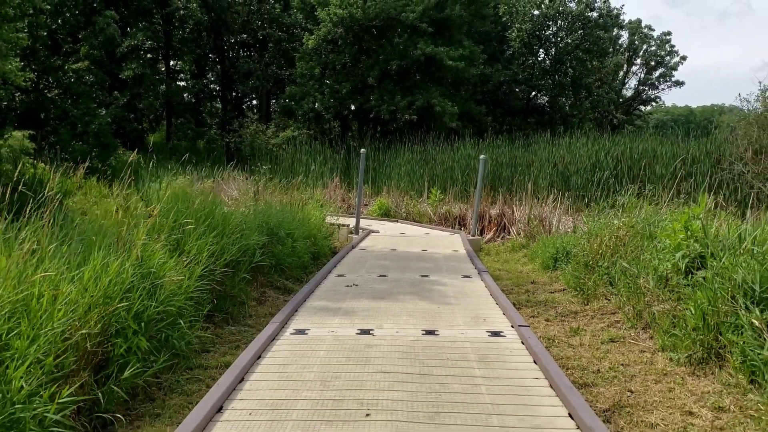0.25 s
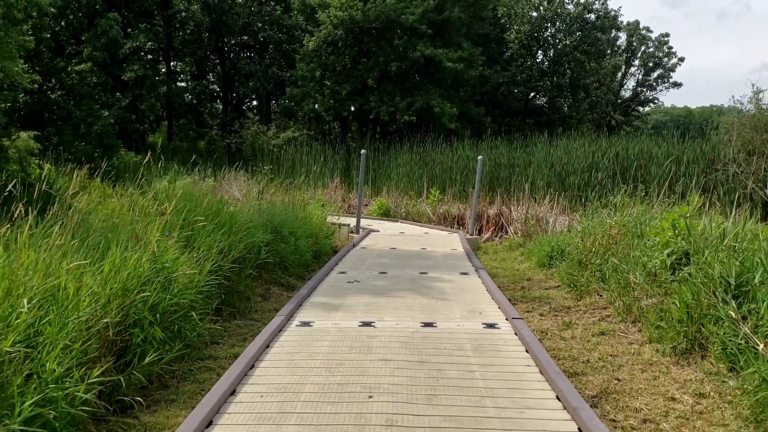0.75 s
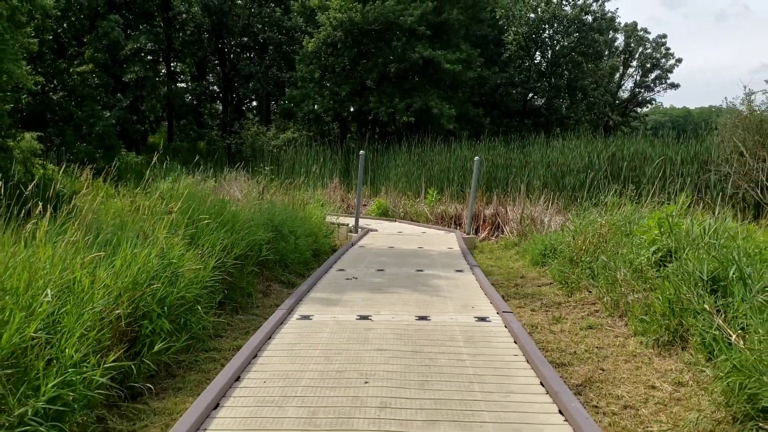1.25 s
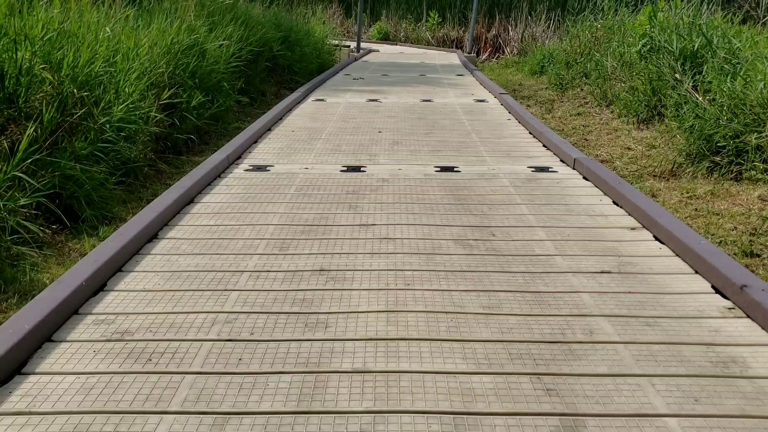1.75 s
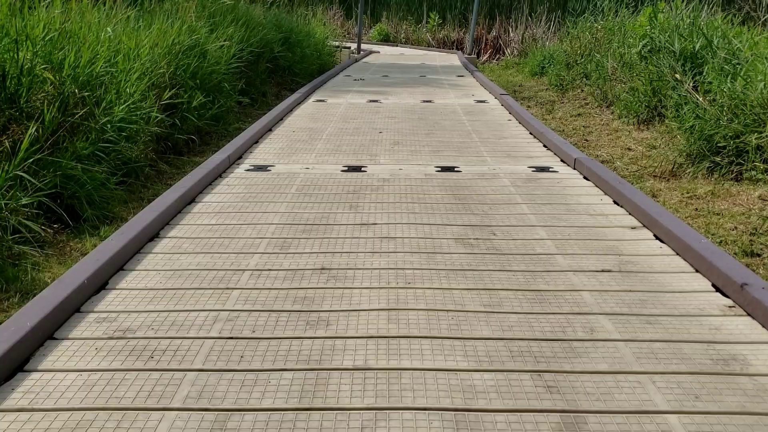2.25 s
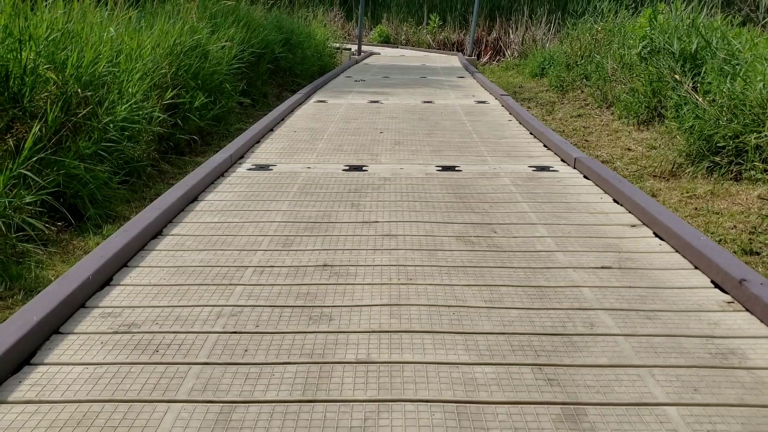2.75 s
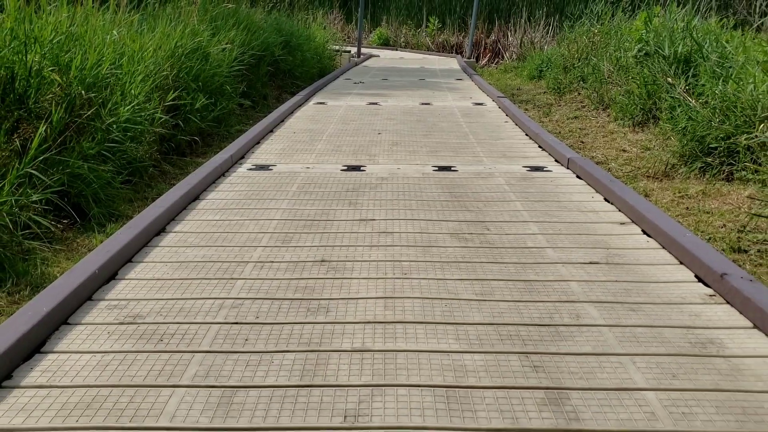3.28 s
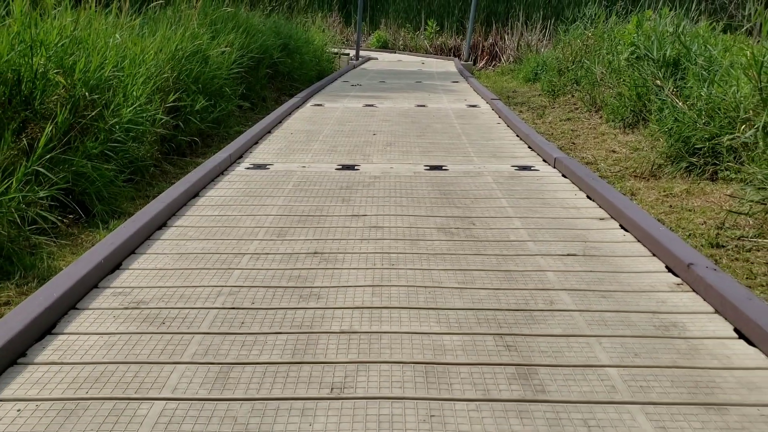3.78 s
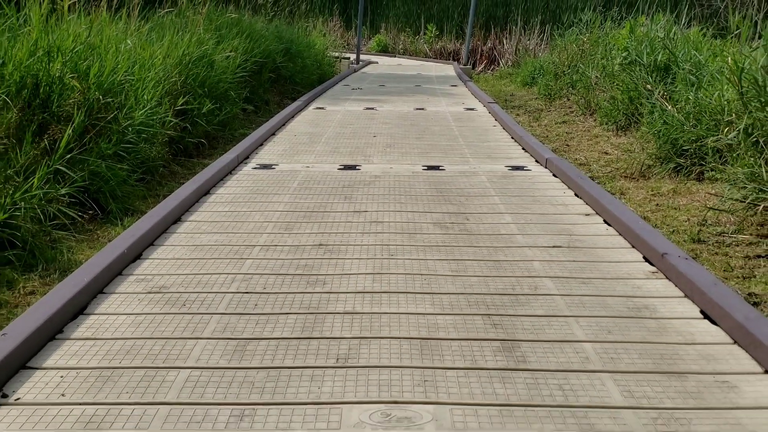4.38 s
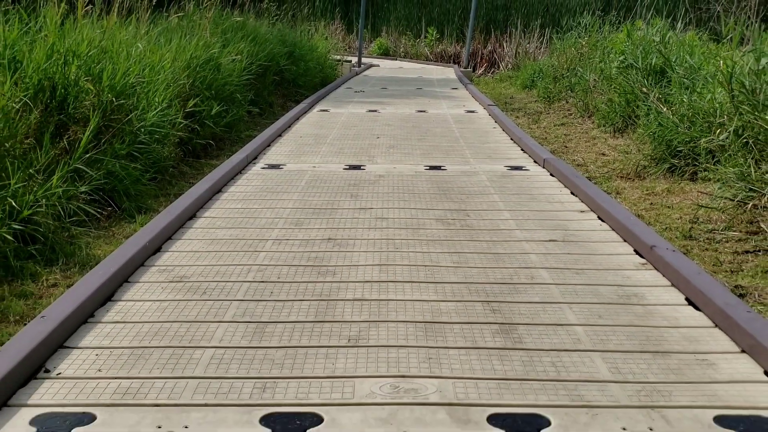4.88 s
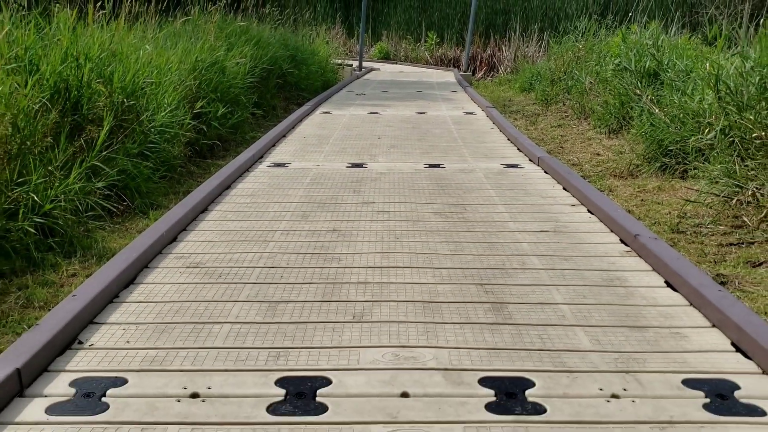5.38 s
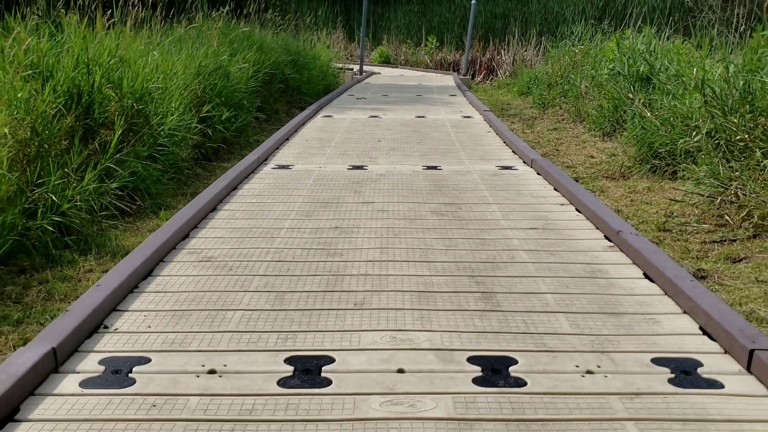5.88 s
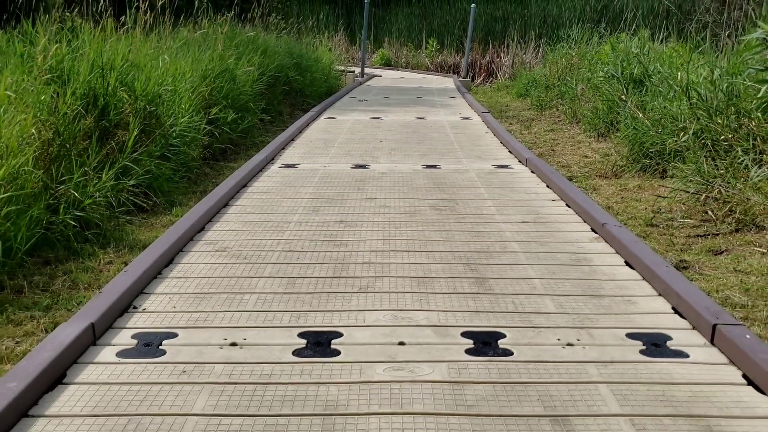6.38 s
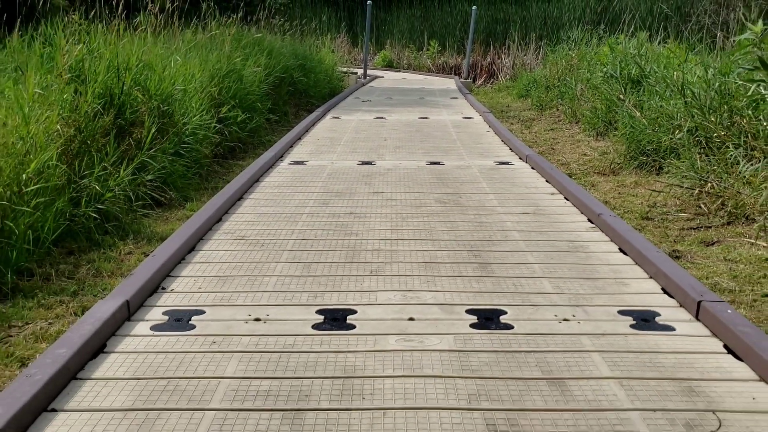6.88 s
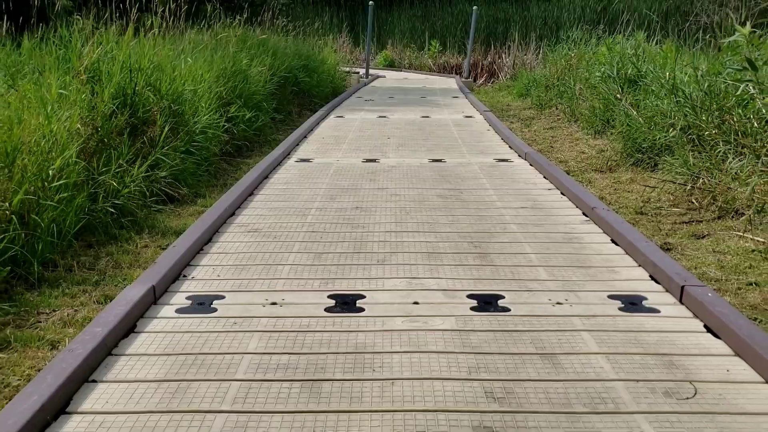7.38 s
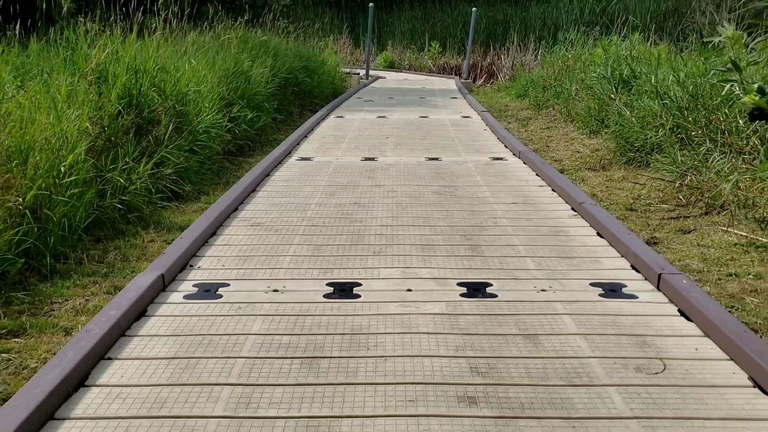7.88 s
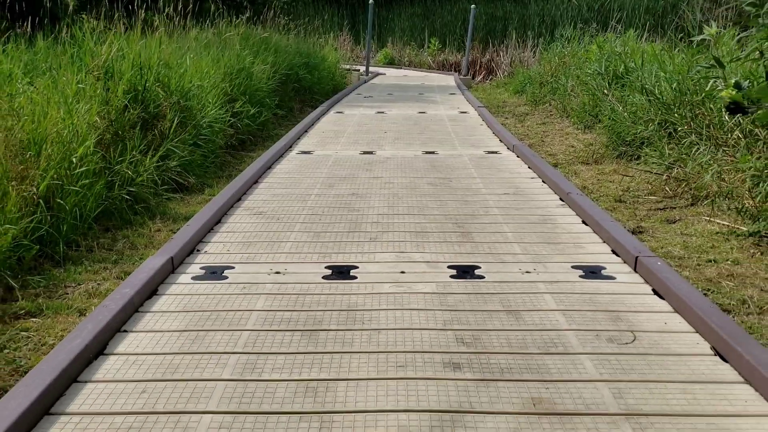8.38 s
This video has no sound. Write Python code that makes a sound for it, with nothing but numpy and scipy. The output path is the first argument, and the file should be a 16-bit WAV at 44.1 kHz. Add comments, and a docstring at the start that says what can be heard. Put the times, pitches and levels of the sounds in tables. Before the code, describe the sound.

Slow, hollow footsteps knock along a plank boardwalk while crickets trill and chirp steadily over a low rumble of air and faint distant engine hum.

```python
"""A plank boardwalk through a marsh, walked by someone holding a camera.
Heels knock: damped plank modes over a deck boom; soles scuff: noise bands; short clicks ring briefly.
Fingers tick and bump the camera: bursts of grainy noise, clicks and damped thumps.
Crickets trill and chirp as pulsed, falling tones, over a noise chorus and a high insect hiss.
Behind them: a low noise rumble of air, a far wash and wavering sine hums of engines."""
import sys
import numpy as np
from scipy import signal
from scipy.fft import rfft, irfft, next_fast_len
from scipy.io import wavfile
from scipy.ndimage import uniform_filter1d

SR = 44100
rng = np.random.default_rng(int(sys.argv[2]) if len(sys.argv) > 2 else 0)


def generate_wav(sig):
    """Save sig (samples, or channels by samples) to the path in sys.argv[1] as 16-bit PCM at SR."""
    pcm = np.round(np.clip(np.atleast_2d(sig).T, -1, 1) * 32767).astype(np.int16)
    wavfile.write(sys.argv[1], SR, pcm)


N = 381465
TIME = np.arange(N) / SR

# pan_db throughout: left minus right

# footfalls; boom and slap before their trims: start_s, knock_db, knock_centre_hz, boom_hz, boom_db,
# note_hz, note_db, slap_db, heel_db
FOOTFALLS = [(0.319, -43, 404, 127, -57, 430, -52, -72, -60),
             (1.045, -29, 235, 276, -41, 231, -38, -61, -43),
             (1.346, -43, 209, 82, -46, 290, -52, -74, -68),
             (1.858, -30, 205, 120, -45, 171, -37, -85, -62),
             (3.753, -32, 225, 74, -44, 190, -39, -72, -57),
             (3.787, -42, 170, 130, -50, 200, -46, -82, -75),
             (3.818, -41, 191, 72.6, -47, 135, -46, -80, -72),
             (4.27, -41, 171, 76.5, -41, 125, -48, -79, -72),
             (4.319, -29, 215, 113, -28.5, 160, -40, -68, -56),
             (4.828, -31, 275, 164, -37, 287, -39, -72, -59),
             (5.468, -60, 174, 85, -43, 132, -48, -80, -75),
             (5.957, -29, 163, 158, -38, 218, -35, -68, -55),
             (6.242, -51, 206.7, 162.5, -53, 300, -56, -69, -60),
             (6.834, -28, 225, 122, -42, 215, -34, -69, -51),
             (7.542, -39, 175, 99, -35.5, 366, -52, -68, -60),
             (7.975, -29, 190, 92.2, -34, 131, -32, -75, -62),
             (8.061, -40.5, 180, 140, -60, 190, -52, -84, -73),
             (8.388, -41, 243, 128, -53, 300, -52, -76, -65),
             (8.63, -38, 224, 136, -33.5, 248, -43, -80, -68)]
# plank modes: mode_hz, level_db, t60_s
PLANK_MODES = [(126, 5.5, 0.38), (163.8, 7, 0.22), (195.3, 5, 0.24), (231.5, 2.5, 0.13), (279.5, 7.5, 0.13),
               (315.5, 2, 0.19), (373, -1, 0.24), (442, -1.5, 0.2), (495, -4.5, 0.22), (555, 0, 0.13),
               (723, 5, 0.11)]
# sole slap spectrum: freq_hz, level_db
SLAP_SPECTRUM = [(200, 4), (500, 6.5), (800, -4.5), (1500, -11.5), (2400, -15.5), (4000, -35), (9000, -53)]
# deck sag spectrum: freq_hz, level_db
SAG_SPECTRUM = [(22, -44), (46, 3.5), (70, -2), (130, 1.0), (300, -37), (900, -55)]
BOOM_TRIM_DB, SLAP_TRIM_DB = 9.5, 10.5
HEEL_HZ, HEEL_PEAK_S = 1340, 0.00029
NOTE_T60_S, BOOM_T60_S = .15, .22
REBOUND_DB, REBOUND_GAP_S, REBOUND_T60_S = -7, .017, .25
LEFT_LAG_S = .0001

# scuffs and squeaks of a sole: start_s, level_db, centre_hz, width_octaves, fade_s
SCUFF_EVENTS = [(1.581, -69, 2090, 0.9, 0.02), (2.239, -66, 3990, 0.03, 0.011),
                (2.279, -66, 4020, .03, 0.0066), (2.24, -67.5, 3400, 0.82, 0.018),
                (2.302, -71, 2820, 0.26, 0.02), (4.299, -69.5, 3000, 0.83, 0.0079),
                (4.415, -76.5, 1900, 0.44, 0.017), (5.959, -70, 1850, 0.25, 0.0056),
                (6.68, -76.5, 3000, .6, 0.041), (7.741, -66, 1880, 0.3, 0.016),
                (7.747, -63, 910, 0.64, 0.02), (8.088, -69.5, 2720, 0.21, 0.017)]
# short clicks with a brief ring: grit, loose planks, and a knock on the camera body at 2.2357 s:
# start_s, ring_db, ring_hz, fade_s, click_db
RINGING_CLICKS = [(1.0508, -53, 1300, .0003, -64), (1.523, -72, 1800, 0.00044, -57),
                  (1.576, -58, 1770, 0.00071, -45.5), (1.594, -64, 1750, .0005, -58),
                  (1.598, -66, 1750, .0005, -54), (1.6093, -46.5, 1810, 0.00072, -49),
                  (1.62, -63, 1860, 0.00065, -57), (2.2357, -42.5, 3670, 0.00038, -42),
                  (2.294, -64, 764, 0.00061, -59), (4.3452, -55, 880, 0.00062, -69),
                  (6.2207, -59, 1800, 0.0018, -63), (7.7611, -45, 1095, .0005, -64)]
# spectrum of their click: freq_hz, level_db
RINGING_CLICK_SPECTRUM = [(500, -10), (2200, 0), (3200, -7), (4500, 0), (6500, -8), (14000, -10)]
OVERTONE_RATIO, OVERTONE_DB = 1.235, -12

# finger touches, before their trim: start_s, level_db, fade_s
TOUCHES = [(0.791, -51, 0.0013), (1.5225, -50, 0.0008), (1.5737, -45, 0.00098), (2.8189, -54, 0.0019),
           (3.3291, -48, 0.0033), (3.669, -63.5, 0.066), (5.071, -61, 0.0091), (5.4225, -52.5, 0.017),
           (5.697, -60, 0.016), (5.92, -62.5, 0.051), (6.094, -64, 0.041), (7.841, -60, 0.015),
           (8.162, -55.5, 0.026), (8.33, -58.5, 0.038)]
# touch spectrum: freq_hz, level_db
TOUCH_SPECTRUM = [(1000, -54), (4000, -11), (8000, -1.5), (10000, 2.5), (11700, 15.5), (14500, 4.5)]
# knocks on the camera body, click before its trim: start_s, click_db, tilt_db_per_octave, thump_db,
# thump_hz, thump_pan_db
BODY_KNOCKS = [(2.2303, -56, -3, -35, 250, 2), (2.2342, -64, 0, -28, 72, -18),
               (2.2357, -29, -3.5, -27.5, 370, 9), (2.2437, -19.5, 3.5, -29, 85, -20)]
# body click spectrum before tilt: freq_hz, level_db
BODY_CLICK_SPECTRUM = [(300, -14), (900, -24), (1500, -31), (2600, -23), (3800, -14), (8000, -11),
                       (11500, 1), (14500, 0)]
# body rattle spectrum: freq_hz, level_db
RATTLE_SPECTRUM = [(100, -17), (350, 7), (650, -1), (1000, -10), (1800, -30), (5000, -60)]
TOUCH_TRIM_DB, CLICK_TRIM_DB, HANDLING_PAN_DB = 7.0, -2.5, -15

# nearest trilling cricket: time_s, wing_tone_hz, level_db
NEAR_TRILL = [(2.35, 6700, -64), (3.6, 6725, -65.5), (4.3, 6700, -68.5), (5.6, 6700, -70), (6.3, 6730, -66),
              (7.1, 6690, -63.5), (7.45, 6640, -64.5), (7.9, 6710, -67), (8.6, 6720, -63)]
NEAR_ENTERS_S, NEAR_STROKES_PER_S, NEAR_FALL_HZ, NEAR_PAN_DB = 2.31, 28.9, 139, 15
# farther trilling crickets: wing_tone_hz, enters_s, strokes_per_s, stroke_fall_hz, level_db, pan_db
FAR_TRILLS = [(6290, -3, 25, 170, -69.5, 0.5), (6265, 0, 38.5, 110, -72, 0), (6920, 5, 41, 250, -73, 0),
              (7164, -1, 42, 150, -73, 3.5), (5980, -3, 27.9, 80, -74, -3.5),
              (6140, -1, 32.5, 170, -73.5, -1.5), (5793, -3, 24.5, 80, -77.5, -4.5),
              (6600, -3, 31, 130, -74.5, 9), (7120, -5, 34, 200, -83, 3.5), (7200, 9, 35, 300, -75, 4)]
# gain of the farther trills: time_s, gain_db
FAR_GAIN = [(0, 2.5), (2.2, 0.5), (3, -2), (5, 1), (6.95, -1.5), (7.2, -2), (7.7, 0), (8.4, 2), (8.65, 2)]
NEAR_UNEVEN_SHARE, FAR_UNEVEN_SHARE = .015, .05  # rms variation of stroke rate
WARM_UP_DB_PER_S = 78
WANDER_HZ, WANDER_DB = 12, 1

# ground cricket on the left: start_s, level_db
LEFT_CHIRP_EVENTS = [(0.268, -66), (0.645, -73), (0.996, -69), (1.401, -68), (1.772, -69), (2.137, -68),
                     (2.284, -66), (2.594, -72), (2.912, -68), (3.277, -68), (3.637, -66), (3.987, -69),
                     (4.333, -67), (4.725, -60), (5.076, -64.5), (5.411, -66), (5.751, -68), (6.083, -69),
                     (6.411, -73), (6.805, -68), (7.117, -62), (7.471, -68), (7.795, -66), (8.118, -67),
                     (8.462, -68)]
# higher ground cricket on the right: start_s, level_db
RIGHT_CHIRP_EVENTS = [(2.287, -73), (2.569, -69), (2.884, -69), (3.209, -71), (3.602, -76), (4.022, -77)]
LEFT_HZ, LEFT_PAN_DB = 7800, 14
RIGHT_HZ, RIGHT_PAN_DB = 8490, -5
# nominal length and rate, varied per chirp
CHIRP_S, CHIRP_STROKES_PER_S, CHIRP_FALL_HZ, CHIRP_RAMP_S = .08, 103, 300, .022
CHIRP_SPREAD_HZ = 10

# far cricket chorus spectrum: freq_hz, level_db
CHORUS_SPECTRUM = [(3000, -89), (4700, -17), (5250, -13), (5500, -6), (5750, -5), (6250, 3.5), (6600, -2),
                   (7000, -10.5), (7500, -7), (8100, -12.5), (9200, -15.5), (11000, -38.5)]
# insect hiss spectrum: freq_hz, level_db
HISS_SPECTRUM = [(2000, -53), (5000, -35), (8500, -10.5), (10300, -4), (11300, 0), (11900, 3.5),
                 (12600, 0.5), (14500, -3)]
# insect hiss level before its trim: time_s, level_db
HISS_LEVEL = [(0.0, -66.5), (0.38, -65), (0.7, -64), (1.71, -65), (2.31, -71), (2.94, -69.5), (4.31, -69.5),
              (4.55, -67.5), (7.2, -70), (7.66, -67), (7.93, -65.5), (8.65, -67)]
HISS_TRIM_DB = 5.5

# rumble of moving air close by, spectrum: freq_hz, level_db
RUMBLE_SPECTRUM = [(15, -50), (28, -24.5), (50, 1), (85, 2), (125, -1), (170, -10), (280, -16.5),
                   (400, -26.5), (700, -38), (2000, -59.5)]
# rumble level before its trim and lulls: time_s, level_db
RUMBLE_LEVEL = [(0, -53), (.6, -50), (.9, -53.5), (1.9, -52.5), (2.1, -50), (2.35, -52.5), (3.0, -53),
                (4.0, -53.5), (4.45, -49.5), (4.8, -52.5), (6.3, -50.5), (6.9, -56), (8.2, -50),
                (8.65, -53)]
# far wash of the land, spectrum: freq_hz, level_db
WASH_SPECTRUM = [(100, -2.5), (400, -5.5), (800, -1), (1300, -9.5), (2200, -11.5), (4000, -10.5),
                 (9000, -30), (14500, -41)]
# far engines, one list each: time_s, hum_hz, level_db
ENGINES = [
    [(0, 120.1, -54.5), (.4, 119.5, -50.5), (.8, 115.8, -76), (3, 120.5, -61.5), (7.1, 135.9, -63),
     (7.6, 135.1, -54), (8.65, 135.3, -47.5)],
    [(1.4, 550, -100), (1.7, 556, -76), (1.85, 570, -81), (2.2, 552, -100)],
    [(.6, 262.7, -82), (1.2, 261.5, -69.5), (1.7, 269.3, -71), (2.1, 256.5, -62.5), (2.5, 262, -87)],
]
RUMBLE_TRIM_DB = -0.5
LULL_DB, LULL_LEAD_S, LULL_WIDTH_S, FIRM_DB = -2.5, 0.14, 0.056, -38
EDGE_HZ = 14650


def footsteps():
    """A heel shoves and rings the planks, they rebound on the joists, the span booms, the sole slaps."""
    out, t = np.zeros((2, N)), np.arange(SR // 2) / SR
    hz, db, t60 = np.transpose(PLANK_MODES)[:, :, None]
    for s, knock_db, centre_hz, boom_hz, boom_db, note_hz, note_db, slap_db, heel_db in FOOTFALLS:
        shove = -np.sin(2 * np.pi * centre_hz * t) * swell(t, .8 / centre_hz) ** 2
        # landing place weights the modes; no two planks are quite alike
        weight = amp(db - 8.4 * np.log2(hz / centre_hz) ** 2)
        tuned_hz = hz * (1 + 0.019 * rng.standard_normal(hz.shape))
        modes = weight * amp(-60 * t / t60) * np.sin(2 * np.pi * tuned_hz * t)
        ring = modes.sum(0)
        knock = -ring / abs(ring).max() * (1 - np.exp(-t / 0.0015))
        note = -np.sin(2 * np.pi * note_hz * t) * amp(-60 * t / NOTE_T60_S) * (1 - np.exp(-t / 0.011))
        boom = np.sin(2 * np.pi * boom_hz * t) * amp(-60 * t / BOOM_T60_S) * (1 - np.exp(-t / 0.014))
        # the deck sags as the weight comes on
        sag = colour(pair(0.91, len(t)), SAG_SPECTRUM) * swell(t, 0.023)
        slap_shape = swell(t, 0.0018) + amp(-6.5) * swell(t, 0.017)
        slap = colour(pair(0.31, len(t)), SLAP_SPECTRUM) * slap_shape
        heel = -np.sin(2 * np.pi * HEEL_HZ * t) * swell(t, HEEL_PEAK_S)
        planks = amp(knock_db) * (amp(-3) * shove + knock)
        deck = planks + amp(note_db) * note + amp(boom_db + BOOM_TRIM_DB) * (boom + amp(-15) * sag)
        add(out, s, deck + amp(slap_db + SLAP_TRIM_DB) * slap + amp(heel_db) * heel)
        for k, (slip, side) in enumerate(rng.uniform(-0.99, 1, size=(4, 2)), 1):
            late_s = REBOUND_GAP_S * (k + .5 * slip)
            rebound_db = knock_db + REBOUND_DB - 60 * late_s / REBOUND_T60_S
            add(out, s + late_s, amp(rebound_db) * knock * sides(8 * side))
    return underfoot(out) * sides(-2.4)


def scuffs():
    """A sole catches and slips on grit and wood; the narrower the band, the more it squeaks."""
    out, t = np.zeros((2, N)), np.arange(SR // 4) / SR
    octaves = np.linspace(-4, 4, 161)
    for s, db, hz, width, fade in SCUFF_EVENTS:
        grit = pair(0.94, len(t)) * amp(5 * np.minimum(rng.exponential(1, len(t)), 5))
        band = np.transpose([hz * 2 ** octaves, -20 * np.log10(1 + (octaves / width) ** 2)])
        add(out, s, amp(db) * colour(grit, band) * swell(t, fade))
    return reeds(out, t60=.2, wet=.45) * sides(-1)


def ringing_clicks():
    """Grit, loose planks or a knock on the camera body: a short click and a brief ring with an overtone."""
    out, t = np.zeros((2, N)), np.arange(SR // 16) / SR
    for s, ring_db, hz, fade, click_db in RINGING_CLICKS:
        click = colour(pair(.8, len(t)), RINGING_CLICK_SPECTRUM) * np.exp(-t / .0007)
        overtone = np.sin(2 * np.pi * OVERTONE_RATIO * hz * t)
        ring = (np.sin(2 * np.pi * hz * t) + amp(OVERTONE_DB) * overtone) * swell(t, fade)
        add(out, s, amp(ring_db) * ring + amp(click_db) * click)
    return reeds(out, t60=.15, wet=.4) * sides(-3.5)


def handling():
    """Fingers stick and slip in tiny grains; knocks click, thump the damped case and rattle it."""
    out, t = np.zeros((2, N)), np.arange(SR // 4) / SR
    for s, db, fade in TOUCHES:
        grains = pair(.3, len(t)) * amp(3 * np.minimum(rng.exponential(1, len(t)), 4))
        # the longer the touch, the softer its start
        shape = np.exp(-t / fade) * (1 - np.exp(-20 * t / fade))
        touch = colour(grains, TOUCH_SPECTRUM) * shape
        add(out, s, amp(db + TOUCH_TRIM_DB) * touch * sides(HANDLING_PAN_DB))
    for s, click_db, tilt, thump_db, thump_hz, pan_db in BODY_KNOCKS:
        tilted = [(hz, db + tilt * np.log2(hz)) for hz, db in BODY_CLICK_SPECTRUM]
        click_shape = swell(t, .0002) + amp(-31) * np.exp(-t / .012)
        click = colour(pair(.2, len(t)), tilted) * click_shape
        # about one cycle
        thump = -np.sin(2 * np.pi * thump_hz * t) * swell(t, 0.37 / thump_hz)
        rattle = colour(pair(0.56, len(t)), RATTLE_SPECTRUM) * np.exp(-t / 0.026)
        body = amp(thump_db) * (thump * sides(pan_db) + amp(-29.0) * rattle)
        add(out, s, amp(click_db + CLICK_TRIM_DB) * click * sides(HANDLING_PAN_DB) + body)
    return out


def trills():
    """One cricket trills near the path and several more, more scattered, out in the reeds."""
    hz, db = follow(NEAR_TRILL)
    near = trill(hz, NEAR_ENTERS_S, NEAR_STROKES_PER_S, NEAR_FALL_HZ, db, NEAR_PAN_DB,
                 blur_hz=18.5, uneven=NEAR_UNEVEN_SHARE)
    far = sum(trill(*row, blur_hz=44.93, uneven=FAR_UNEVEN_SHARE) for row in FAR_TRILLS)
    far = far * amp(follow(FAR_GAIN)[0])
    return reeds(near, t60=.06, wet=.35) + reeds(far, t60=.12, wet=2.4)


def trill(hz, enters_s, strokes_per_s, fall_hz, db, pan_db, blur_hz, uneven):
    """Each wing stroke is a short tone that falls in pitch; strokes repeat steadily, none quite alike."""
    rate = strokes_per_s * (1 + 0.013 * drift(3.13) + uneven * drift(25.3))
    stroke = np.cumsum(rate) / SR % 1
    closing = np.minimum(stroke / .55, 1)  # silent for the rest of the stroke
    pitch_hz = hz + WANDER_HZ * drift(.6) + fall_hz * (.5 - closing) + blur_hz * drift(79.0)
    tone = unit(np.sin(np.pi * closing) * np.sin(2 * np.pi * np.cumsum(pitch_hz) / SR))
    warm_up_db = WARM_UP_DB_PER_S * np.minimum(TIME - enters_s, 0)
    level_db = db + warm_up_db + WANDER_DB * drift(0.78) + 1.84 * drift(8.2)
    return tone * amp(level_db) * sides(pan_db)


def chirps():
    """Two ground crickets chirp in the grass, one on each side."""
    left = chirper(LEFT_CHIRP_EVENTS, LEFT_HZ, LEFT_PAN_DB)
    right = chirper(RIGHT_CHIRP_EVENTS, RIGHT_HZ, RIGHT_PAN_DB)
    return reeds(left + right, t60=.06, wet=.5)


def chirper(rows, hz, pan_db):
    """A chirp is eight or so quick wing strokes, each sliding down as the wings slow."""
    out = np.zeros((2, N))
    for s, db in rows:
        t = np.arange(0, CHIRP_S * rng.uniform(.92, 1.2), 1 / SR)
        stroke = t * CHIRP_STROKES_PER_S * (1 + 0.029 * rng.standard_normal()) % 1
        wobble, force = uniform_filter1d(rng.standard_normal((2, len(t))), size=120)
        note_hz = hz + CHIRP_SPREAD_HZ * rng.standard_normal()
        pitch_hz = note_hz + CHIRP_FALL_HZ * (.2 - stroke ** 3) + 75 * unit(wobble)
        tone = np.sin(np.pi * stroke) * np.sin(2 * np.pi * np.cumsum(pitch_hz) / SR)
        rise = np.minimum(.3 + t / CHIRP_RAMP_S, 1)
        shape = rise * signal.windows.tukey(len(t), .3) * amp(unit(force))
        add(out, s, amp(db) * unit(tone * shape) * sides(pan_db))
    return out


def marsh():
    """Countless far crickets merge into a noise band; other insects hiss above it, to the right."""
    chorus_db = -63.0 + .5 * drift(1.4) + 0.82 * drift(54)
    chorus = colour(pair(0.014, N), CHORUS_SPECTRUM) * amp(chorus_db) * sides(0.083)
    hiss_db = follow(HISS_LEVEL)[0] + HISS_TRIM_DB + .5 * drift(22)
    hiss = colour(pair(0.061, N), HISS_SPECTRUM) * amp(hiss_db) * sides(-12.5)
    return chorus + hiss


def air():
    """Lumpy noise rumble of air, a smooth far wash and wavering sine hums of engines."""
    rumble_db = follow(RUMBLE_LEVEL)[0] + lulls() + RUMBLE_TRIM_DB + 2 * drift(10.5)
    rumble = colour(pair(0.86, N), RUMBLE_SPECTRUM) * amp(rumble_db)
    wash = colour(pair(0.039, N), WASH_SPECTRUM) * amp(-74.0 + 1.65 * drift(21.0))
    hum = np.zeros(N)
    for engine in ENGINES:
        hz, db = follow(engine)
        turns = np.cumsum(hz * (1 + 0.008 * drift(6.7))) / SR
        hum += np.sqrt(2) * np.sin(2 * np.pi * turns) * amp(db + 0.4 * drift(13))
    return underfoot(rumble + hum) * sides(-3.0) + wash * sides(0.011)


def lulls():
    """Rumble gain in dB: it eases while the foot swings toward a firm step."""
    firm_s = [s for s, knock_db, *_ in FOOTFALLS if knock_db > FIRM_DB]
    return LULL_DB * sum(np.exp(-((TIME - s + LULL_LEAD_S) / LULL_WIDTH_S) ** 2) for s in firm_s)


def underfoot(x):
    """Footfalls, rumble and hums reach the left ear a moment after the right."""
    return np.array([np.interp(TIME - LEFT_LAG_S, TIME, x[0]), x[1]])


def reeds(x, t60, wet):
    """Reeds and trees scatter a sound differently toward each ear: a decaying noise tail."""
    t = np.arange(SR // 2) / SR
    tail = rng.standard_normal((2, len(t))) * amp(-60 * t / t60)
    echo = signal.fftconvolve(x, tail / np.linalg.norm(tail[0]), axes=1)[:, :N]
    return (x + wet * echo) / np.sqrt(1 + wet ** 2)


def amp(db):
    """Decibels to gain."""
    return 10 ** (np.asarray(db) / 20)


def unit(x):
    """Scales to an rms of one."""
    return x / np.sqrt(np.mean(x ** 2) + 1e-20)


def sides(db):
    """Left and right gains of equal total power for a level difference."""
    return unit(amp([[db / 2], [-db / 2]]))


def follow(rows):
    """The columns of a curve at every sample."""
    s, *columns = np.transpose(rows)
    return [np.interp(TIME, s, c) for c in columns]


def colour(x, spectrum):
    """Filters a sound by a spectrum of (freq_hz, level_db), to an rms of one."""
    hz, db = np.transpose(spectrum)
    size = next_fast_len(x.shape[-1])
    f = np.fft.rfftfreq(size, 1 / SR)
    gain = amp(np.interp(np.log(f + 1), np.log(hz), db))
    return unit(irfft(rfft(x, size) * gain, size)[..., :x.shape[-1]])


def drift(per_s):
    """Slow random wandering at an rms of one."""
    step = 64
    f = np.fft.rfftfreq(N // step, step / SR)
    slow = irfft(rfft(rng.standard_normal(N // step)) * np.exp(-(f / per_s) ** 2))
    return unit(np.interp(TIME, np.arange(len(slow)) * step / SR, slow))


def pair(likeness, size):
    """Noise at two ears, partly shared."""
    shared, c = rng.standard_normal(size), np.clip(likeness, 0, 1)
    return np.sqrt(c) * shared + np.sqrt(1 - c) * rng.standard_normal((2, size))


def swell(t, fade):
    """A quick rise to one and a slower fall."""
    return t / fade * np.exp(1 - t / fade)


def add(mix, s, sound):
    """Mixes a sound in at a time."""
    part = mix[:, max(round(s * SR), 0):][:, :sound.shape[-1]]
    part += sound[..., :part.shape[1]]


def scene():
    """The walker and the marsh."""
    walker = footsteps() + scuffs() + ringing_clicks() + handling()
    return walker + trills() + chirps() + marsh() + air()


def record(dry):
    """Low-pass at EDGE_HZ."""
    lowpass = signal.firwin(511, EDGE_HZ, window=("kaiser", 9), fs=SR)
    return signal.oaconvolve(dry, lowpass[None], "same", axes=1)


dry = scene()
out = record(dry)
generate_wav(out)
```